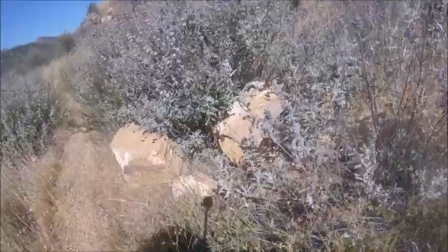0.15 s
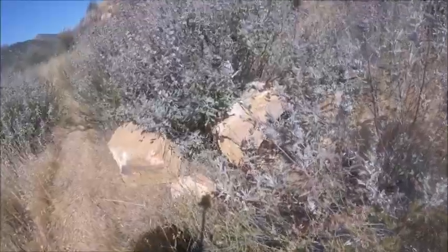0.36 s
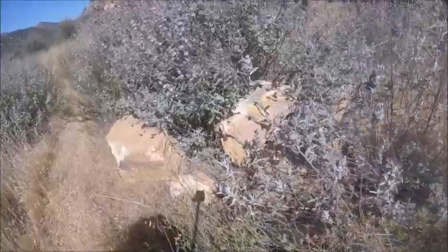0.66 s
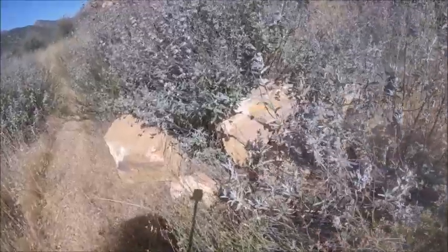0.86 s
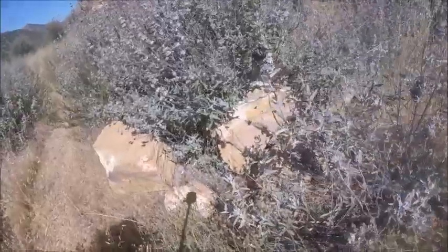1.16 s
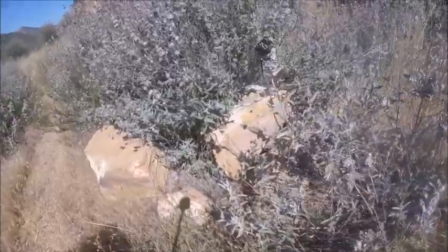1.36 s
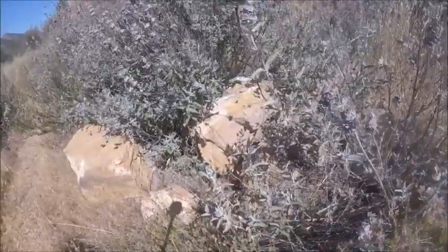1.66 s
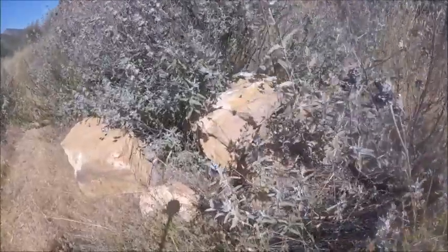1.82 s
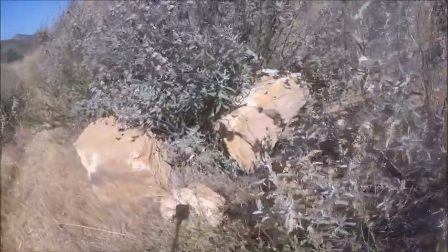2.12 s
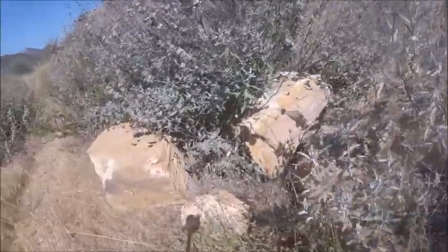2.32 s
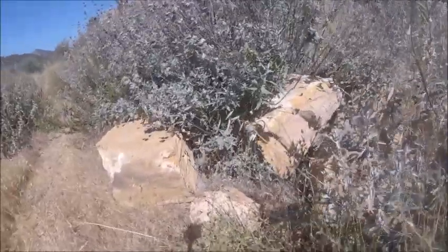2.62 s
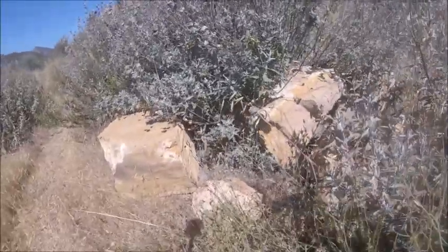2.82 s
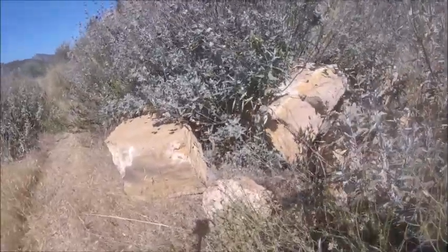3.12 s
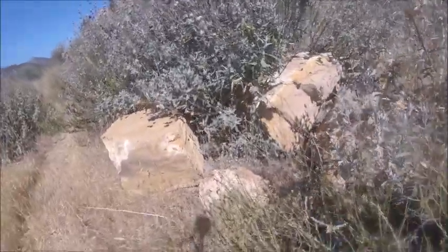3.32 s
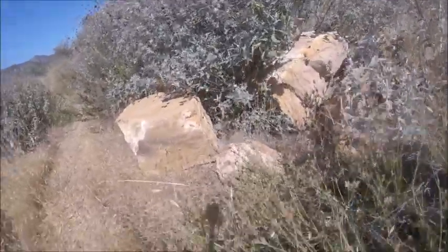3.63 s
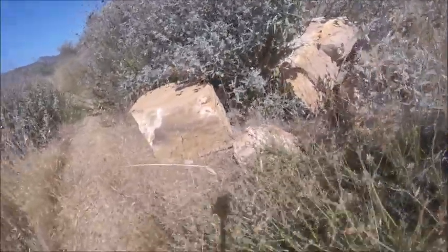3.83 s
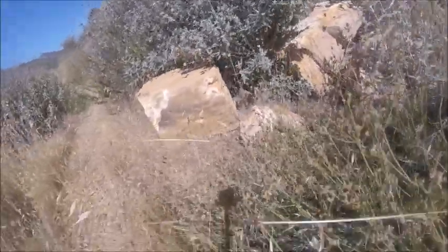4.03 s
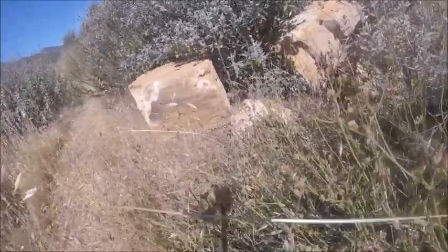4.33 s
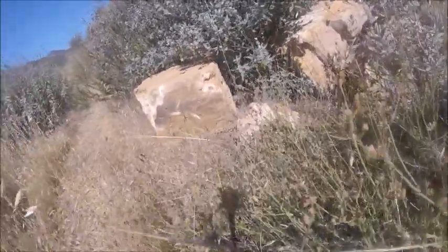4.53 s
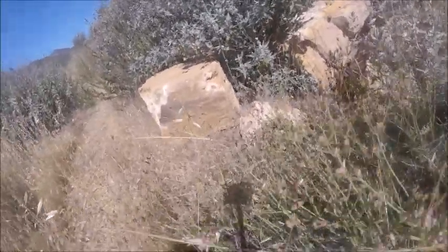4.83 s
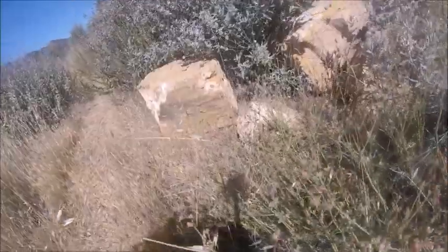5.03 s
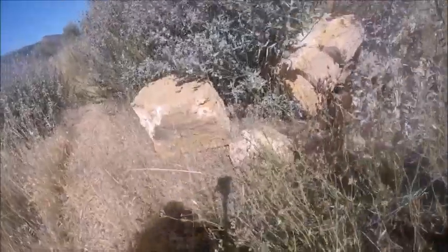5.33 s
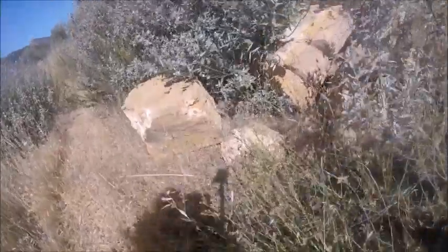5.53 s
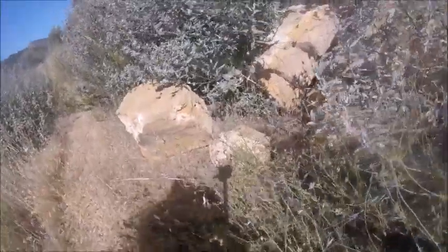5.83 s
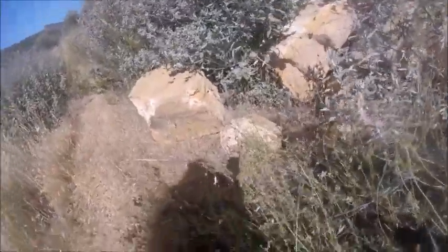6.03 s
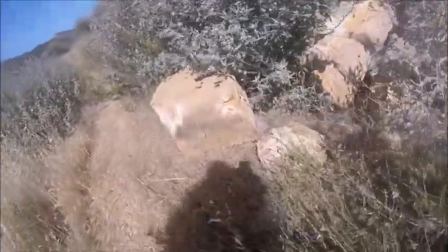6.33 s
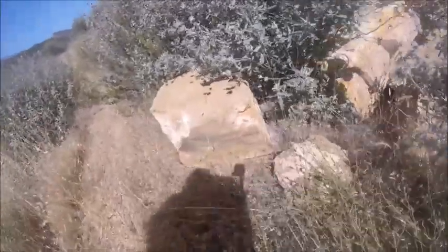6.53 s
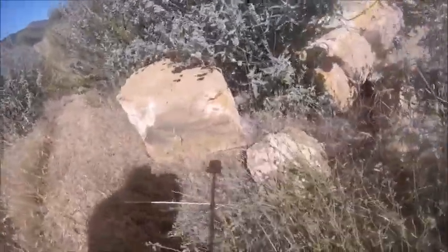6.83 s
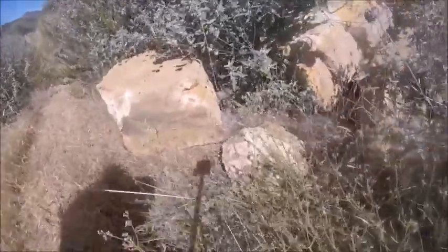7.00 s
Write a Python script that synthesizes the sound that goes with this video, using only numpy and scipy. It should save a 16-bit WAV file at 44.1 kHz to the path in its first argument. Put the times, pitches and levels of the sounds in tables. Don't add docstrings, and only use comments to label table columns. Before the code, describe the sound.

A rattlesnake hidden in dry brush buzzes from beginning to end: about 130 tail strokes a second, slowing very slightly, fused into a dry, sizzling rattle strongest around 4 to 6 kHz. From 0 to 2 s it is strong and steady, with small joint ticks near 0.15 and 0.4 s and low grip rumble; bumps follow around 1.6-1.8 s. It is fullest near 2.3 s, amid a cluster of ticks and hollow pole jolts. Thumps continue at 3.1-3.6 s. From 3.7 s the buzz fades, quietest and more open in treble from 4.3 to 5.1 s, while the clamp creaks in ever quicker ticks from 4.1 to 4.8 s over dull bumps. By 5.5 s the buzz partly recovers. More handling thumps come around 5.8-6.1 s, a sharper rap at 6.5 s, and final bumps near 7 s. Faint leaves and hiss remain behind.

```python
import sys
import numpy as np
from scipy import signal
from scipy.fft import rfft, irfft, next_fast_len
from scipy.io import wavfile
from scipy.ndimage import uniform_filter1d, map_coordinates

SR = 44100
rng = np.random.default_rng(int(sys.argv[2]) if len(sys.argv) > 2 else 0)


def nominal_scale(level):
    x = np.asarray(level, float) / 20
    return 10 ** x


def persist_wave(psi):
    counts = np.round(np.clip(psi, -1, 1) * 32767).astype(np.int16)
    wavfile.write(sys.argv[1], SR, np.atleast_2d(counts).T)


N = 315756


def unit(x):
    return x / np.sqrt(np.mean(x ** 2) + 1e-20)


def even(x, span):
    return x / np.sqrt(abs(uniform_filter1d(x ** 2, size=int(span * SR))) + 1e-20)


def curves(rows):
    s, *columns = np.transpose(rows)
    return [np.interp(np.arange(N) / SR, s, column) for column in columns]


def wobble(rate):
    knots = rng.standard_normal(int(N * rate / SR) + 4)
    return map_coordinates(knots, [np.arange(N) * rate / SR])


def swells(start_s, half_s, level_db):
    t = np.arange(0, N, 64) / SR
    bells = np.exp(-((t - start_s[:, None]) / half_s[:, None]) ** 2)
    power = (nominal_scale(level_db)[:, None] ** 2 * bells).sum(axis=0)
    return np.interp(np.arange(N) / SR, t, power)


def filtered(x, response):
    m = next_fast_len(N + SR // 2)
    return irfft(rfft(x, m) * response(np.fft.rfftfreq(m, 1 / SR)), m)[..., :N]


def colour(points):
    def response(hz):
        f, db = np.transpose(points)
        gain_db = np.interp(np.log(hz + 1), np.log(f + 1), db)
        cepstrum = irfft(np.log(nominal_scale(gain_db) + 1e-6))
        cepstrum[1:len(hz)] *= 2
        cepstrum[len(hz):] = 0
        return np.exp(rfft(cepstrum))
    return response


def resonance(centre_hz, width_hz):
    return lambda f: 1j * f * width_hz / (centre_hz ** 2 - f * f + 1j * f * width_hz)


def ripples(points, width):
    def response(hz):
        return nominal_scale(sum(db * np.exp(-((hz - centre) / (width * centre)) ** 2) for centre, db in points))
    return response


def noise(response):
    return unit(filtered(rng.standard_normal(N), response))


# pitch_hz, level_db [dB per Hz]
AIR_COLOUR = [(120, -22.5), (200, -11.5), (291, -5.5), (778, -9.5), (1560, -10), (2080, -7.0), (2370, -7.0),
              (2560, -6.5), (2710, -10.0), (2800, -6.5), (3640, -39), (6160, -120)][:-2] + [(5000, -15.5),
              (14000, -20.5)]
# start_s, level_db
BREEZE_LEVEL = [(0, -59.5), (1.2, -60), (2.4, -57.5), (2.85, -59.5), (6.1, -58.5), (6.54, -57),
                (6.85, -58.5)]
# pitch_hz, level_db
HOUSING_RIPPLES = [(1750, -1), (2130, 1), (2400, -1)]


def air():
    def response(hz):
        return colour(AIR_COLOUR)(hz) * ripples(HOUSING_RIPPLES, width=.06)(hz)
    level_db = curves(BREEZE_LEVEL)[0] + 2.5 + 0.42 * wobble(9)
    return nominal_scale(level_db) * noise(response)


# start_s, snap_db, pitch_hz, bright_db [bright click]
JOINT_TICKS = [(0.146, -41, 676, -66), (0.37, -44, 840, -70), (2.263, -47, 929, -63),
               (2.303, -51, 964, -54), (2.34, -55, 834, -47), (2.364, -46.5, 807, -65),
               (2.566, -49, 740, -62), (2.873, -48, 600, -56), (3.137, -63, 676, -59),
               (3.222, -56, 700, -69), (3.296, -46.5, 1010, -68), (3.586, -46, 638, -49),
               (5.696, -50, 842, -50), (5.829, -46.5, 910, -56), (6.201, -58, 705, -58),
               (6.392, -45, 1040, -49)]
# start_s, snap_db
CLAMP_CREAK = [(4.135, -42), (4.353, -44.5), (4.446, -43), (4.505, -46), (4.563, -45.5), (4.612, -47),
               (4.665, -49), (4.696, -47), (4.723, -47), (4.753, -50), (4.782, -47), (4.8, -46),
               (4.951, -48)]
# start_s, snap_db, pitch_hz, bright_db
POLE_RAP = (6.481, -58, 600, -36)


def ticks():
    pole_db, pole_hz = -59, 464
    rows = [(*tick, pole_db, pole_hz) for tick in JOINT_TICKS]
    rows += [(s, db, 710, -68, -57, pole_hz) for s, db in CLAMP_CREAK]
    rows += [(*POLE_RAP, -46.5, 353)]
    start_s, snap_db, snap_hz, bright_db, knock_db, knock_hz = np.transpose(rows)[:, :, None]
    scatter = np.append(rng.standard_normal(len(rows) - 1), 0)
    knock_hz = knock_hz * (1 + 0.074 * scatter[:, None])
    t = np.arange(SR // 20) / SR

    def mode(db, hz, rise_s):
        return nominal_scale(db) * t / rise_s * np.exp(1 - t / rise_s) * np.sin(2 * np.pi * hz * t)

    ring = mode(snap_db - 0.5, snap_hz, 0.00081) + mode(snap_db - 7, 1.39 * snap_hz, 0.00093)
    ring = ring - mode(bright_db - 2.0, 1640, 0.00099)
    ring = ring + mode(knock_db + 3.5, knock_hz, 0.003)
    at = np.round(start_s * SR).astype(int) + np.arange(len(t))
    return np.bincount(at.ravel(), ring.ravel(), N)


TREMOR_RATE = 9
# start_s, level_db
GRIP_LEVEL = [(0, -52.5), (.7, -48), (1.5, -45.5), (2.0, -48), (2.9, -43), (4.0, -44.5), (4.6, -42),
              (5.4, -45), (6.1, -44), (7.16, -47)]
# pitch_hz, level_db [dB per Hz]
RUMBLE_COLOUR = [(8.8, -46), (15, -4), (38, 2), (49, -0.5), (62, -6.5), (81, -28), (140, -120)]
# start_s, level_db, half_s [half length]
GRIP_BUMPS = [(.01, -41, 0.021), (0.58, -49, 0.054), (.72, -48, 0.032), (1.453, -46, 0.054),
              (1.624, -40, 0.032), (1.786, -38.5, 0.02), (2.325, -42.5, 0.063), (2.444, -41.5, 0.021),
              (3.12, -39.5, 0.075), (3.46, -40.5, 0.079), (3.629, -34, 0.025), (4.283, -39, 0.024),
              (4.358, -36.5, .03), (4.534, -35.5, 0.018), (4.617, -40, 0.017), (4.72, -37.5, .035),
              (4.972, -50, 0.036), (5.847, -38, 0.044), (6.036, -41, 0.05), (6.133, -38, 0.023),
              (6.292, -43, 0.024), (5.56, -43, 0.035), (6.505, -45, 0.036), (6.676, -41.5, 0.029),
              (6.86, -37.5, 0.042), (6.946, -38.5, 0.02), (7.042, -37.5, 0.017)]


def grip_rumble():
    def duller(hz):
        return colour(RUMBLE_COLOUR)(hz) * resonance(38, 45)(hz)
    tremor = nominal_scale(curves(GRIP_LEVEL)[0] + 2 * wobble(TREMOR_RATE))
    rumble = tremor * even(noise(colour(RUMBLE_COLOUR)), span=0.056)
    start_s, level_db, half_s = np.transpose(GRIP_BUMPS)
    bumps = np.sqrt(swells(start_s, half_s, level_db)) * even(noise(duller), span=.06)
    return rumble + bumps


# pitch_hz, width_hz
POLE_MODES = [(85, 49), (135, 28.5), (215, 43)]
POLE_REST = [-57, -61.5, -71]
# start_s, level_db
POLE_FREEDOM = [(0, -1), (1.4, 0), (2.5, -1.5), (3.8, 1.5), (4.5, -0.5), (5.2, 1.5), (5.7, -3.5),
                (6.4, -0.5), (6.8, -0.5)]
# start_s, half_s [half length], low_db, middle_db, high_db [one per mode]
POLE_JOLTS = [(.3, 0.087, -61, -51.5, -76), (.82, 0.055, -50, -61, -66.5), (1.56, 0.043, -60, -48.5, -62.5),
              (1.69, 0.022, -46, -47, -75), (2.34, 0.023, -51, -45.5, -62), (2.45, 0.027, -58, -56, -63),
              (1.35, 0.1, -53.5, -69, -76), (2.72, 0.034, -54, -59, -75), (3.15, 0.022, -48, -49.5, -49.5),
              (3.28, .07, -50, -49, -61.5), (3.47, 0.058, -54, -51, -56.5), (3.58, 0.036, -56, -50, -67),
              (3.98, 0.03, -51, -52.5, -62), (4.13, 0.036, -54, -69, -55), (4.55, .04, -59, -58, -64.5),
              (4.73, 0.036, -63, -62, -61), (5.86, 0.052, -65, -58, -62.5), (6.04, .06, -63, -54.5, -63),
              (6.4, .03, -56, -51.5, -70), (6.49, 0.027, -60, -49, -62), (7.08, 0.029, -60, -60, -69)]


def pole_hum():
    start_s, half_s, *jolts_db = np.transpose(POLE_JOLTS)
    hum = np.zeros(N)
    for rest_db, jolt_db, mode in zip(POLE_REST, jolts_db, POLE_MODES):
        rest = nominal_scale(rest_db + curves(POLE_FREEDOM)[0] + 2.2 * wobble(TREMOR_RATE))
        level = np.sqrt(rest ** 2 + swells(start_s, half_s, jolt_db))
        bend = resonance(*mode)
        hum += level * even(noise(lambda hz: bend(hz) ** 2), span=0.0586)
    return hum


# start_s, rate_hz [strokes per s]
TAIL_STROKES = [(0.0, 138.75), (1.0, 135.58), (2.0, 133.97), (2.9, 128.88), (3.6, 128.35), (4.4, 128.55),
                (5.1, 125.83), (6.0, 124.72), (7.16, 123.6)]
# start_s, level_db
SIDE_BALANCE = [(0, -4.5), (.9, 5), (1.5, 0.5), (2.5, 0), (3.2, 2.5), (3.9, 3.5), (4.5, -2), (5.3, 4),
                (6.2, 3), (7.16, -1)]


def clicks(count, spread, trail, size_db, stroke_db):
    swing = .24 + np.cumsum(curves(TAIL_STROKES)[0]) / SR
    strokes = np.arange(int(swing[-1]) + 2)[:, None]
    when = strokes - .07 + spread * rng.standard_normal((len(strokes), count))
    when = when + trail * rng.exponential(size=when.shape)
    at = np.interp(when, swing, np.arange(N)).astype(int)
    side_db = curves(SIDE_BALANCE)[0][at] * (.5 - strokes % 2)
    blow_db = stroke_db * rng.standard_normal(strokes.shape) + size_db * rng.exponential(size=when.shape)
    inside = (at > 0) * (at < N - 1)
    size = nominal_scale(blow_db + side_db) * rng.standard_normal(when.shape) * inside
    return unit(np.bincount(at.ravel(), size.ravel(), N))


SEGMENT_PITCHES = [2600, 3500, 4400, 5300, 6300, 7500, 9000, 11000, 13500]


def segments():
    total = np.zeros(N)
    for only_this in np.eye(len(SEGMENT_PITCHES)):
        knocks = clicks(count=60, spread=.12, trail=.08, size_db=.6, stroke_db=.4)
        total += filtered(knocks, lambda hz: np.sqrt(np.interp(hz, SEGMENT_PITCHES, only_this)))
    return total


# start_s, level_db
BUZZ_LEVEL = [(0, -38), (1.0, -37.5), (2.3, -35.8), (3.0, -37.5), (3.73, -39.5), (4.31, -45), (5.08, -45.5),
              (5.52, -40), (6.32, -40.5), (6.42, -38.5), (7.16, -40)]
# pitch_hz, level_db
BRUSH_BLUR = [(3000, 0), (5500, -3), (8000, 3.5), (12000, 5)]
# start_s, level_db [over the buzz]
HARD_STROKES = [(.7018, 26), (.7027, 24), (1.5137, 27), (1.5149, 28), (1.545, 23), (2.389, 25),
                (5.6876, 26), (5.6885, 25)]
# start_s, end_s
STANCE_TIMES = [(0, 1.85), (2.1, 2.45), (2.7, 3.5), (3.7, 4.05), (4.25, 5.1), (5.4, 6.25), (6.7, 7.16)]
# pitch_hz, level_db [dB per Hz]
STANCE_COLOURS = [
    [(2800, -26.5), (3500, -18.5), (4600, -1.9), (6100, -6), (7100, -16), (9000, -25.5), (11000, -37.5),
     (14000, -41.5)],
    [(2800, -29), (3500, -23.5), (4600, -10), (6100, -10), (7100, -22), (9000, -30.5), (11000, -40.5),
     (14000, -47)],
    [(2800, -26.5), (3500, -11.5), (4600, 0.5), (6100, -7.5), (7100, -17.5), (9000, -30), (11000, -37),
     (14000, -45)],
    [(2800, -26), (3500, -12), (4600, -7.5), (6100, -10), (7100, -17.5), (9000, -23.5), (11000, -32),
     (14000, -46)],
    [(2800, -17.5), (3500, -10), (4600, -2), (6100, -3.0), (7100, -10.9), (9000, -9), (11000, -24),
     (14000, -50)],
    [(2800, -22.5), (3500, -8), (4600, -5.5), (6100, -8.5), (7100, -11.5), (9000, -23.5), (11000, -29),
     (14000, -47.5)],
    [(2800, -20.5), (3500, -8.5), (4600, -0.2), (6100, -7), (7100, -11.0), (9000, -23), (11000, -25),
     (14000, -56)],
]
# pitch_hz, level_db
STANCE_ECHOES = [
    [(3180, -3), (3940, -7), (4780, 2.5), (5080, -4), (6290, 2.9), (6760, -8.5), (7630, -7), (9080, -5)],
    [(3240, 6), (3410, 6.5), (3560, 3), (4360, 2), (4590, 4.5), (5340, 6.5), (5920, 6), (8980, 0.5)],
    [(4060, -3), (4270, -13.5), (4490, -8), (4880, -13), (5340, 2.5), (6760, -6), (8540, 7.5), (9450, 7.5)],
    [(3560, -5), (3860, 4.0), (4230, -16), (5130, 8), (5740, 5.5), (7790, 3), (9850, 2.5), (10260, -4)],
    [(3050, -7.4), (3340, 7), (3820, 9), (4100, -6), (5450, -3), (7480, 5), (8370, -4.5), (9260, -7)],
    [(3820, 6.5), (4270, -5), (4680, 4), (5130, 6), (5400, 9), (5740, 6.5), (8540, 6), (9550, 5)],
    [(3210, -2), (4100, -4), (4490, -8.5), (5030, 1.5), (5450, 5), (7870, 1), (8450, 8), (9450, 1.5)],
]
# pitch_hz, level_db [dB per Hz]
BUZZ_LOW_END = (1700, -58)


def rattle():
    def blur(hz):
        return nominal_scale(np.interp(hz, *np.transpose(BRUSH_BLUR)))
    source = unit(segments()) + filtered(rng.standard_normal(N), blur)
    start_s, crack_db = np.transpose(HARD_STROKES)
    source = source + np.bincount((start_s * SR).astype(int), nominal_scale(crack_db), N)

    count = len(STANCE_TIMES)
    stance = np.interp(np.arange(N) / SR, np.ravel(STANCE_TIMES), np.repeat(np.arange(count), 2))
    heard = np.zeros(N)
    for k in range(count):
        tone = colour([BUZZ_LOW_END, *STANCE_COLOURS[k]])
        echoes = ripples(STANCE_ECHOES[k], width=.03)
        fade = np.sqrt(np.clip(1 - abs(stance - k), 0, 1))
        heard += fade * unit(filtered(source, lambda hz: tone(hz) * echoes(hz)))

    steady = even(heard, span=.05)
    flutter = nominal_scale(0.81 * wobble(17)) - 1
    steady = steady + flutter * filtered(steady, resonance(5060, 2600))
    return nominal_scale(curves(BUZZ_LEVEL)[0]) * steady


def scene():
    return (air() + ticks() + grip_rumble() + pole_hum() + rattle())[None]


# pitch_hz, share [of frames]
LOST_LINES = [(2250, 0), (2380, .2), (2500, .04), (2700, .06), (2800, .55), (2900, 0), (8000, .02),
              (9300, .18), (10300, .48), (12000, .42), (13800, .45), (14000, .8)]


def dropouts(x):
    hz, t, z = signal.stft(x, SR, nperseg=2048, noverlap=1024)

    def near(lines, frames):
        across = uniform_filter1d(abs(z) ** 2, size=lines, axis=-2)
        return uniform_filter1d(across, size=frames)

    usual = np.sqrt(near(6, 40) / (near(50, 40) + 1e-30))
    strength = near(6, 4) / (near(50, 4) * usual + 1e-30)
    rank = strength.argsort().argsort() / len(t)
    kept = rank >= np.interp(hz, *np.transpose(LOST_LINES))[:, None]
    in_band = (hz < 14020)[:, None]
    return signal.istft(z * kept * in_band, SR, nperseg=2048, noverlap=1024)[1][..., :N]


def top_cut(x):
    return signal.sosfilt(signal.butter(12, 14640, fs=SR, output="sos"), x)


def record(dry):
    mix = dropouts(dry)
    return top_cut(mix)


dry = scene()
out = record(dry)
persist_wave(out)
```